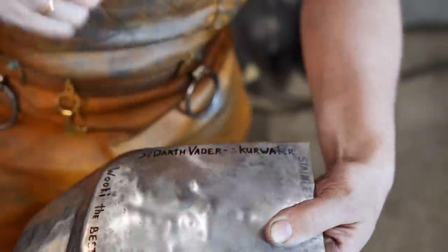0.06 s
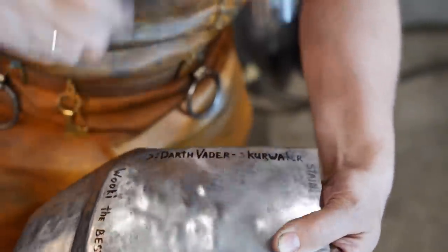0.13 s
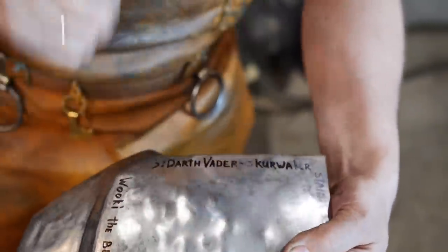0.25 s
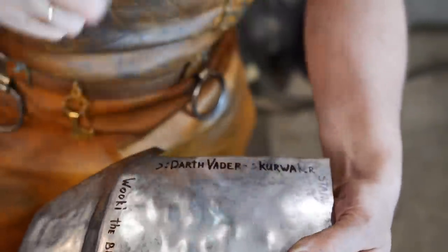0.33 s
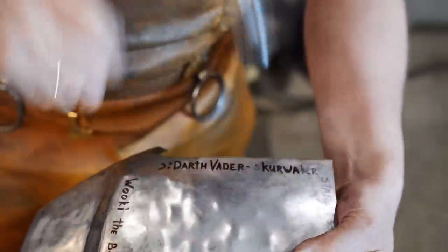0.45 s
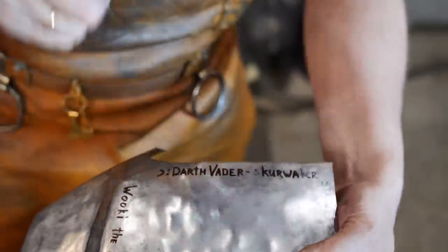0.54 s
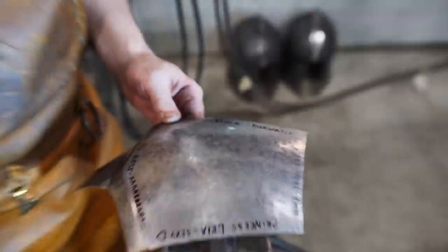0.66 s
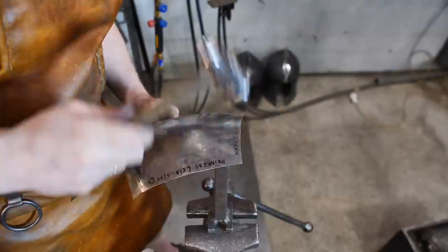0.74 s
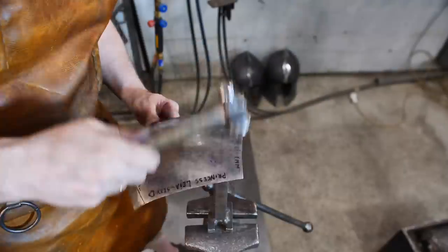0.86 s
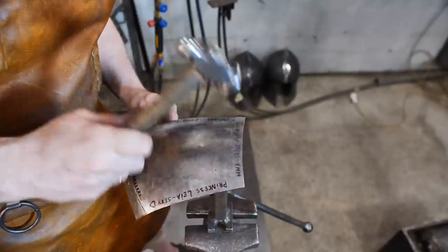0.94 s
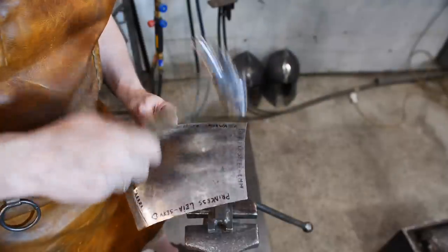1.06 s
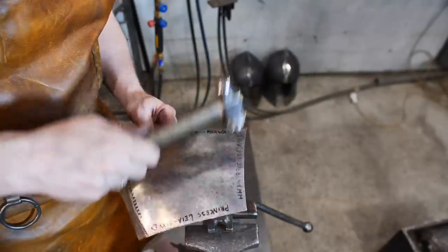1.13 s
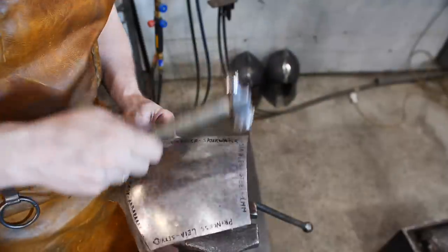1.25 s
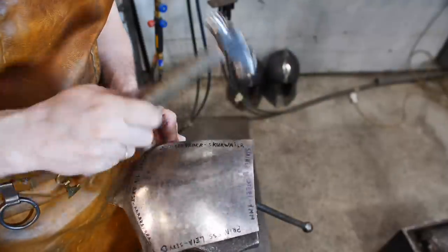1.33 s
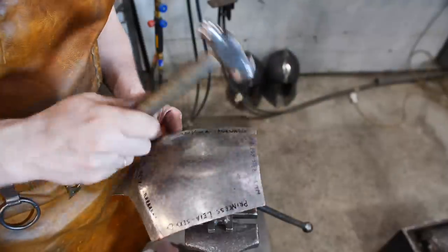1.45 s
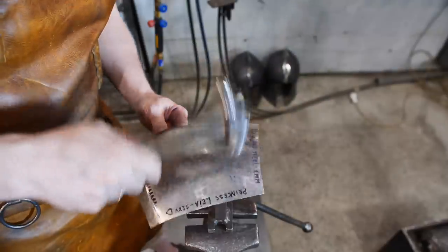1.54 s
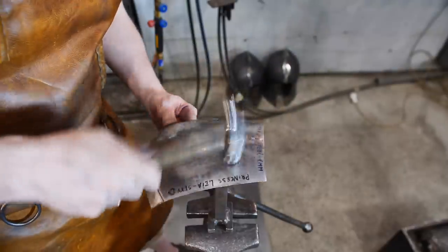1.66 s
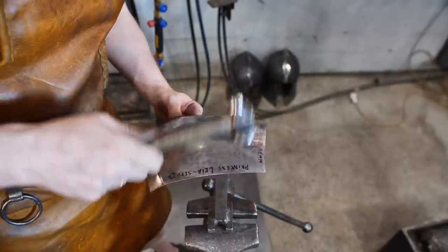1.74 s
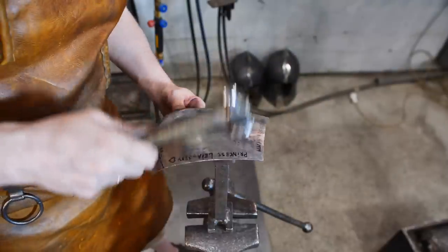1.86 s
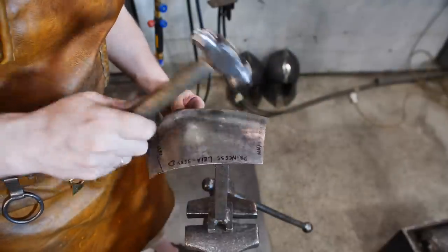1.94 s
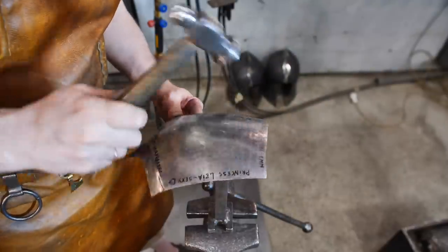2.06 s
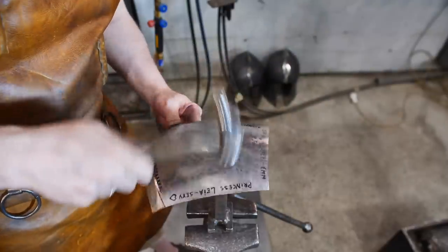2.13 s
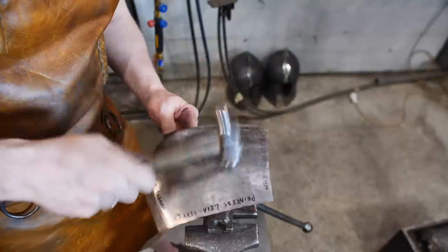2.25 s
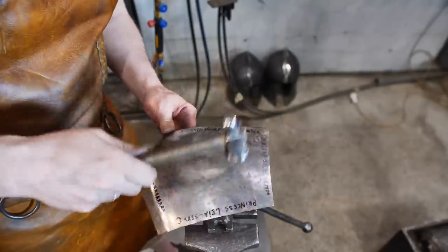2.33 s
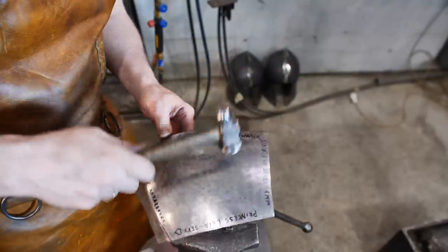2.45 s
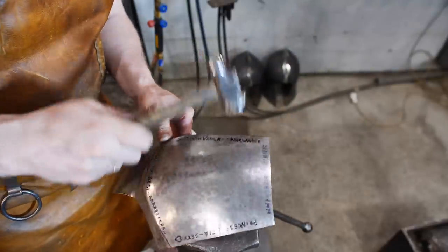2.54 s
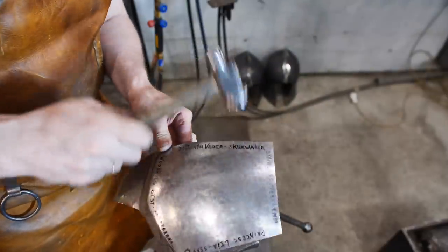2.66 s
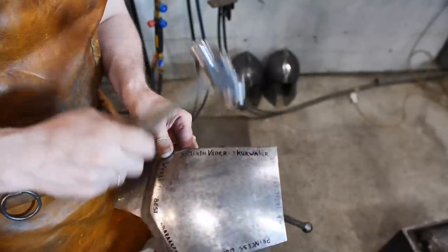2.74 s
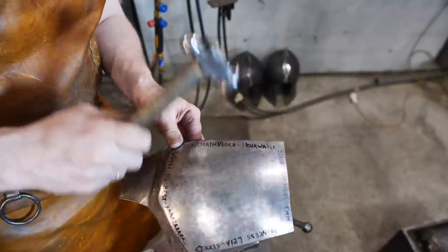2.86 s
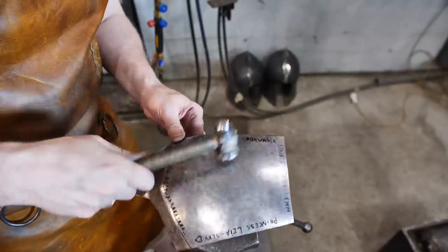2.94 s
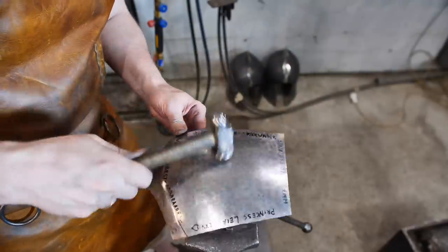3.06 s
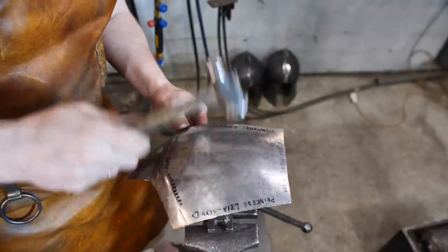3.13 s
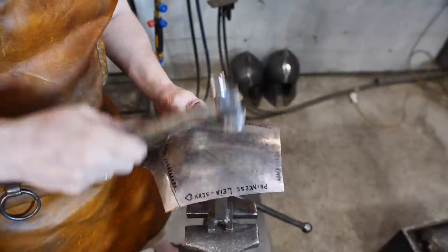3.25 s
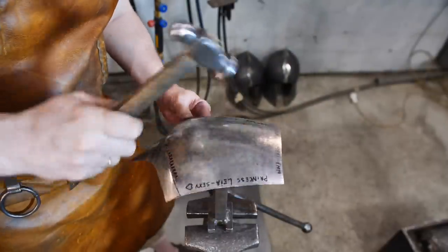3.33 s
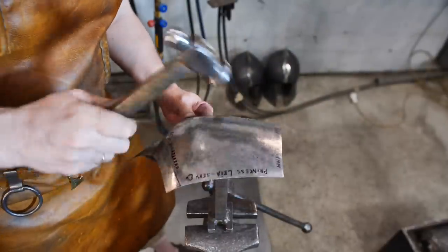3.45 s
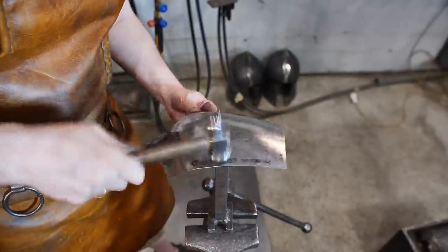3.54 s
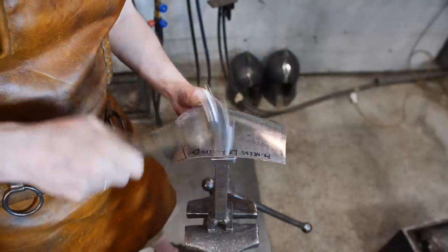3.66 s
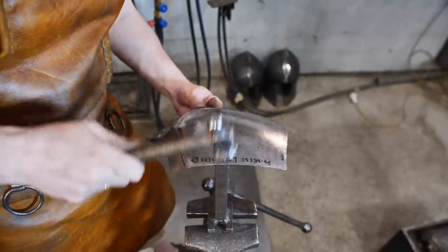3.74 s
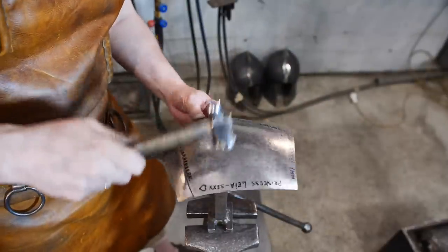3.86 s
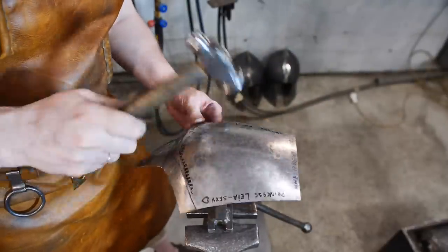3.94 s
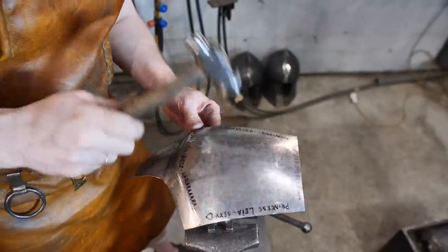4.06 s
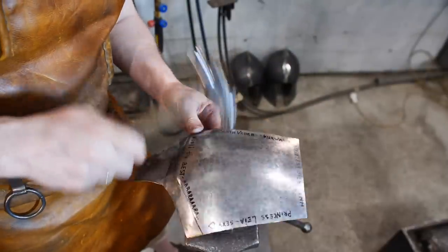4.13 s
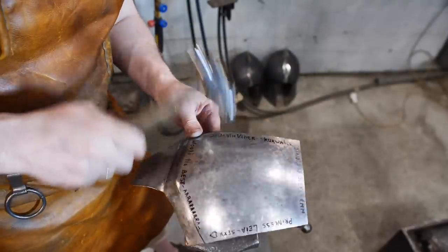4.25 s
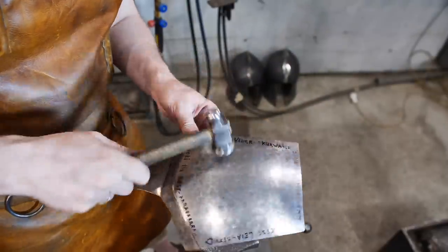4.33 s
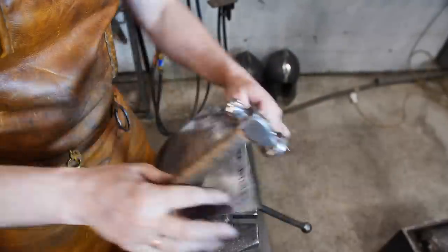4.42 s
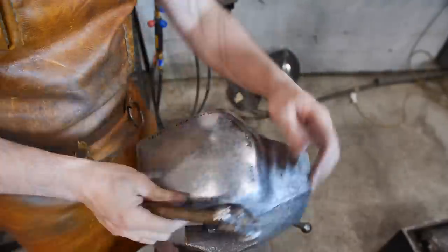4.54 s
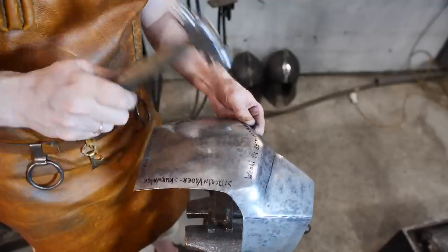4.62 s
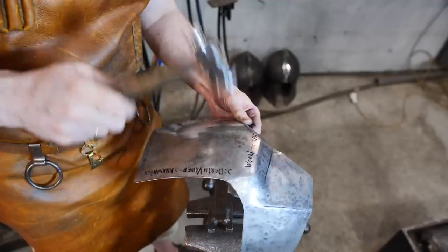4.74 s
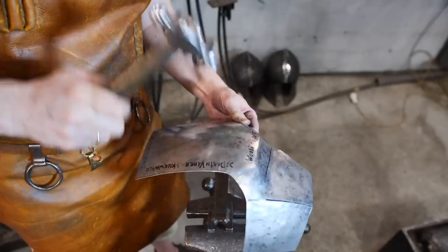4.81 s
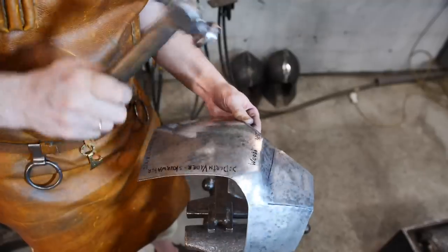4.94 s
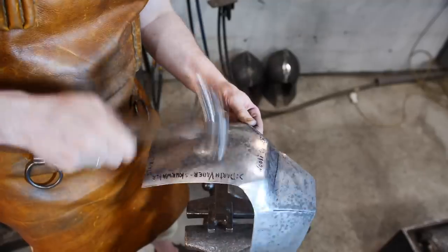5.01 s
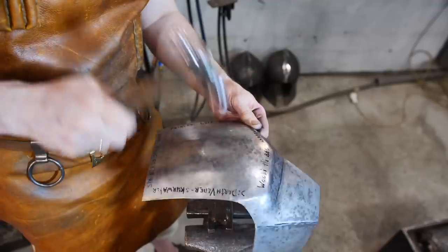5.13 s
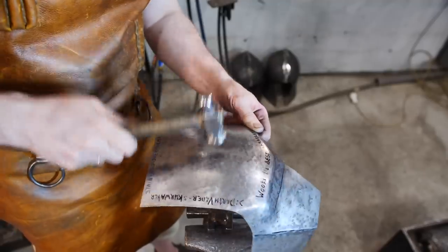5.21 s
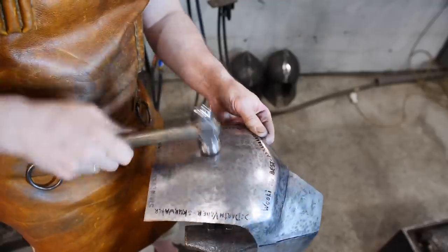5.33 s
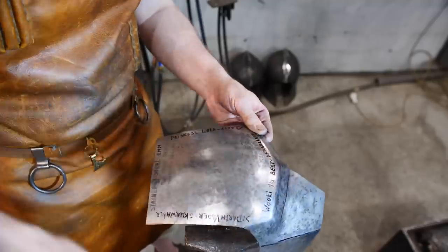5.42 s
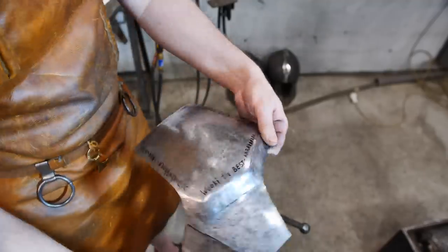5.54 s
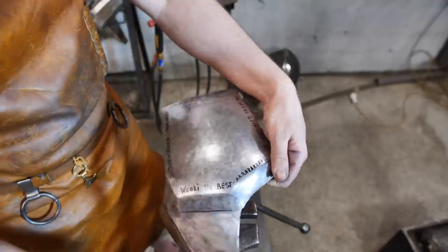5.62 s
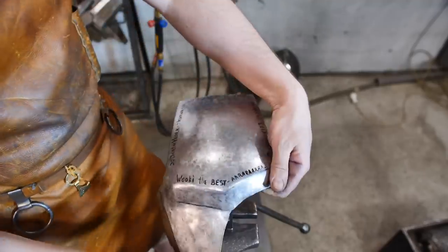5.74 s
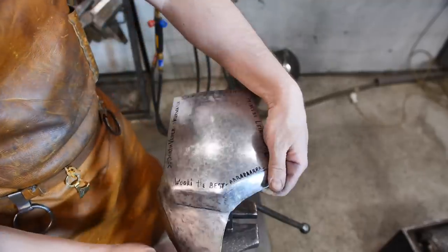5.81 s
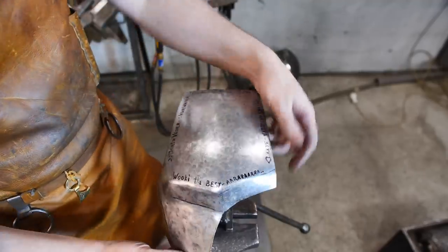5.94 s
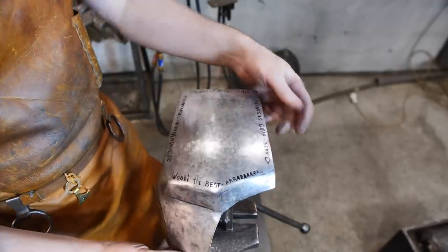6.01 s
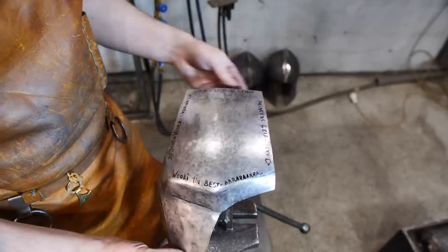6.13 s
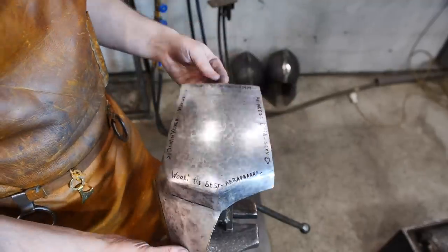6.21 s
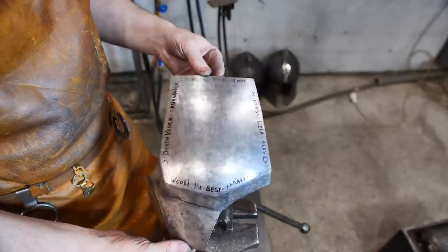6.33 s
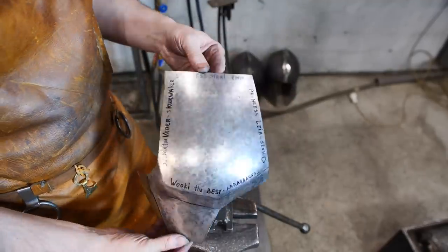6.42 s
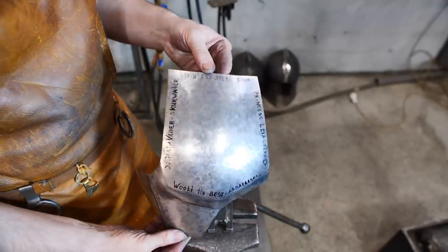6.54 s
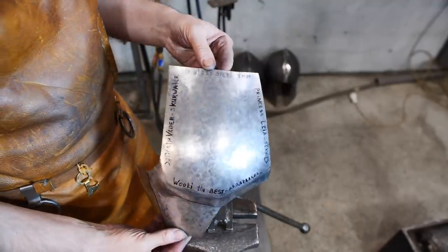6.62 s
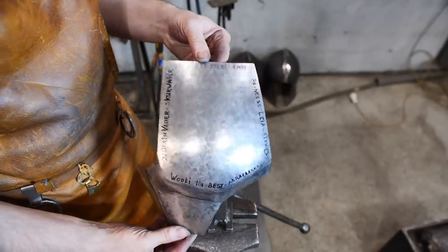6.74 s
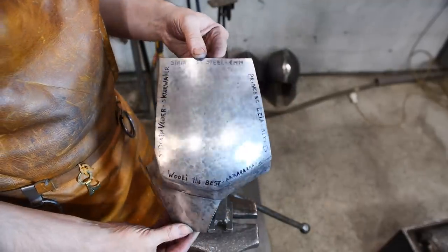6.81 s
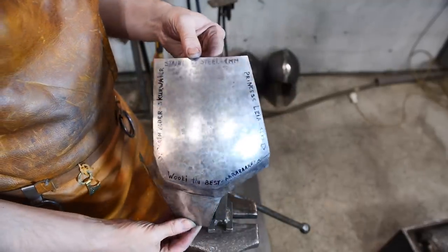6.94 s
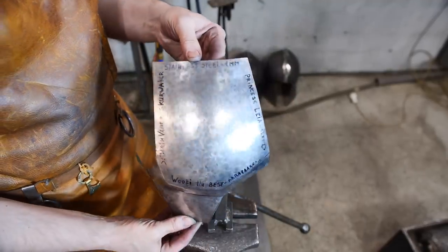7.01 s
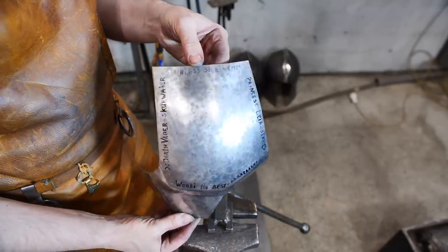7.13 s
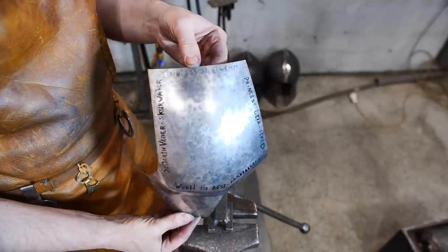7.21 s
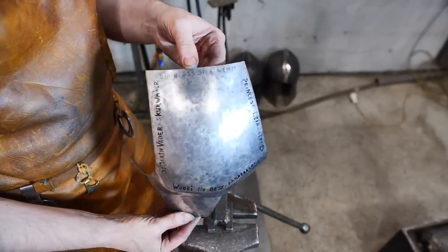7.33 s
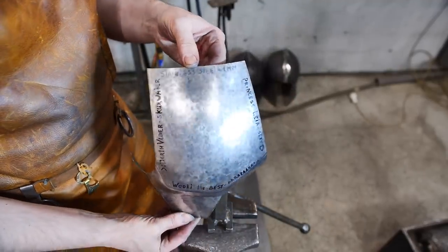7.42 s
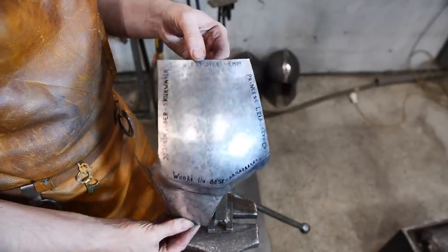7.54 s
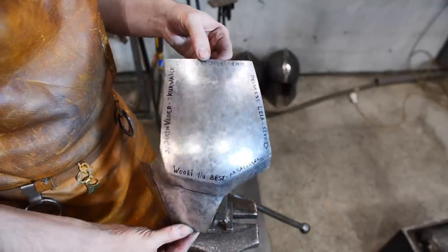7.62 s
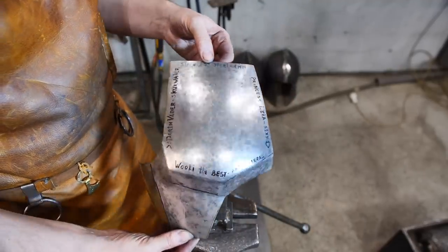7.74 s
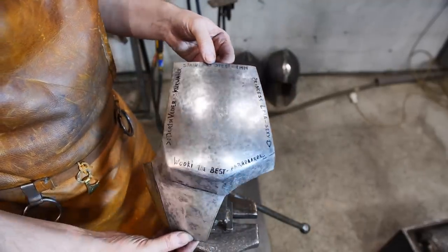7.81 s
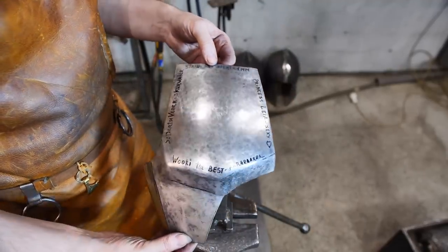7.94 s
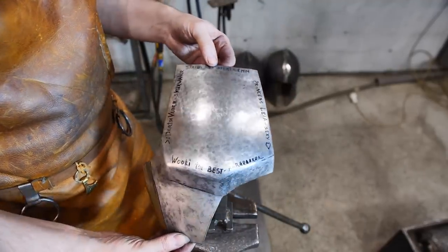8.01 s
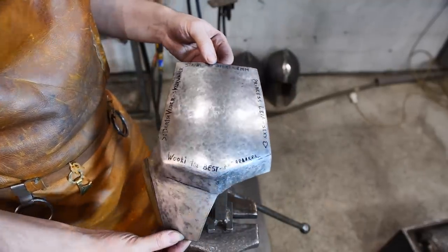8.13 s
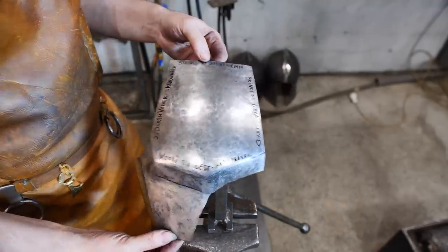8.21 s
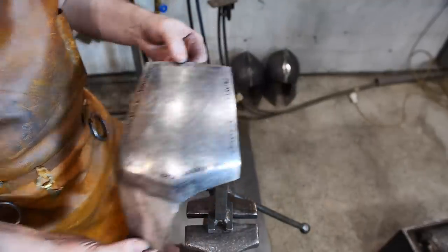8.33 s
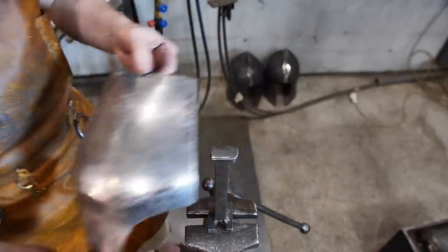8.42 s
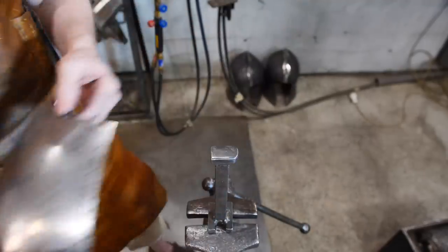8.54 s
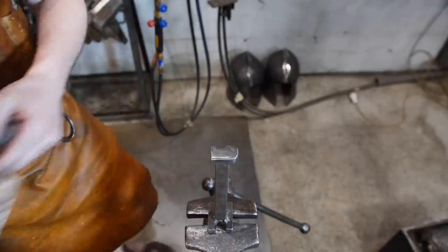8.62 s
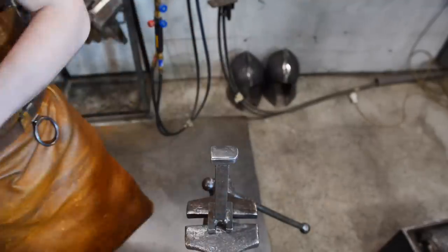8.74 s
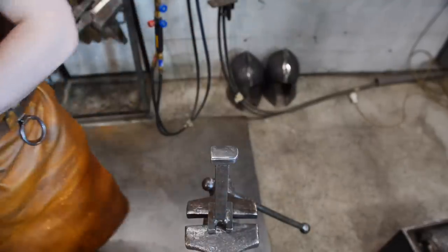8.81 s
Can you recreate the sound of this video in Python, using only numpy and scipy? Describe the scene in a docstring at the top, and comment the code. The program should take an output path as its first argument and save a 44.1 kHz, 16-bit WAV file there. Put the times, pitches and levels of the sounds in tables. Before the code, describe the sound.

Close and dry in a small workshop, a light hammer strikes thin sheet steel on a stake. About six heavier blows stop abruptly in a short silence, then fast, even, bright clangs follow, many as tight double hits, with one brief scrape midway. After the last blow the sheet clanks and rubs against the stake while low hum, hiss and a thin high whine come up.

```python
"""A small hammer planishes a thin curved steel sheet over a stake in quick even runs, many blows heard as close pairs.
Then the sheet is shifted, knocked and slid about by hand while hum, hiss and whine rise in level.
Hits ring paired sine modes and burst noise bands; slides excite the modes with dense random catches.
Narrow tones are noise through resonances; the workshop is a wavering sine, shaped noise and a high sine."""
import sys
import numpy as np
from scipy import signal
from scipy.fft import rfft, irfft
from scipy.io import wavfile

SR = 44100
rng = np.random.default_rng(int(sys.argv[2]) if len(sys.argv) > 2 else 0)


def dump_mix(stems):
    """Bounce the given channels to the path in sys.argv[1] as a 16-bit WAV at rate SR."""
    frames = np.atleast_2d(stems).T  # one column per channel
    limited = np.clip(frames, -1, 1)  # hard clip at full scale
    pcm = np.round(limited * 32767).astype(np.int16)
    wavfile.write(sys.argv[1], SR, pcm)


N = 391148


def amp(db):
    """Decibels to gain."""
    return 10 ** (np.asarray(db) / 20)


def unit(x):
    """Scaled to rms 1."""
    return x / np.sqrt(np.mean(x ** 2) + 1e-20)


def in_time(rows):
    """Columns of a curve, one value a sample."""
    s, *columns = np.transpose(rows)
    return [np.interp(np.arange(N) / SR, s, c) for c in columns]


def at_hz(rows, hz):
    """Columns of a table at the given frequency, interpolated over log frequency."""
    where, *columns = np.transpose(rows)
    return [np.interp(np.log(hz), np.log(where), c) for c in columns]


def clicks(times_s, sizes):
    """A train of single samples."""
    out = np.full(N, 1e-18)
    np.add.at(out, np.round(np.asarray(times_s) * SR).astype(int), sizes)
    return out


def fade(x, t60_s):
    """Each click dies away by 60 dB in t60_s."""
    return signal.lfilter([1], [1, -amp(-60 / (t60_s * SR))], x)


def ring(x, hz, t60_s):
    """Two-pole resonance: a unit click starts a dying sine of height 1."""
    r = amp(-60 / (t60_s * SR))
    w = 2 * np.pi * hz / SR
    return signal.lfilter([0, np.sin(w)], [1, -2 * r * np.cos(w), r * r], x)


def band_pass(x, edges_hz):
    """Second-order Butterworth band."""
    return signal.sosfilt(signal.butter(2, edges_hz, "band", fs=SR, output="sos"), x)


def bands(low_hz):
    """Third-octave noise bands of rms 1 with centre and width in Hz, neighbours unrelated."""
    white = rng.standard_normal((2, N))
    edges = low_hz * 2 ** (np.arange(40) / 3)
    edges = edges[edges < .45 * SR]
    for k, (low, high) in enumerate(zip(edges, edges[1:])):
        yield unit(band_pass(white[k % 2], [low, high])), np.sqrt(low * high), high - low


# Hum, hiss and whine are brought up by rising gain.
# Each row: time in seconds, hum level in dB, hiss level in dB (before HISS_TRIM_DB).
BACKGROUND_LEVEL = [(5.6, -94, -96), (5.85, -85.5, -88), (6.1, -75, -85.5), (6.75, -70, -89),
                    (7.35, -65.5, -76), (7.6, -63.5, -80.5), (8.5, -58, -70), (8.87, -59, -68)]
# Hiss spectrum. Each row: frequency in Hz, relative density in dB per Hz.
HISS_SPECTRUM = [(40, -21.5), (100, -13), (200, -16), (500, -25), (1100, -21.5), (1800, -39), (3500, -36),
                 (7000, -42.5), (12000, -45), (16000, -46)]
HUM_HZ, WHINE_HZ = 48, 15009
HISS_TRIM_DB, WHINE_RE_HISS_DB = -10.0, -1


def workshop():
    """Mains hum wavering in level and phase, a broad hiss and a thin high whine."""
    hum_db, hiss_db = in_time(BACKGROUND_LEVEL)
    t = np.arange(N) / SR
    hz = np.maximum(np.arange(N // 2 + 1) * SR / N, 20)
    density_db = at_hz(HISS_SPECTRUM, hz)[0] - at_hz(HISS_SPECTRUM, 8400)[0]
    hiss = irfft(rfft(rng.standard_normal(N)) * amp(density_db), N) * np.sqrt(SR / 12000)
    whine = amp(WHINE_RE_HISS_DB) * np.sin(2 * np.pi * WHINE_HZ * t)
    waver_db = 1.5 * np.interp(t, np.arange(200) / 16, rng.standard_normal(200))
    waver_rad = .25 * np.interp(t, np.arange(200) / 12, rng.standard_normal(200))
    hum = amp(waver_db) * np.sin(2 * np.pi * HUM_HZ * t + waver_rad)
    return amp(hum_db) * np.sqrt(2) * hum + amp(hiss_db + HISS_TRIM_DB) * (hiss + whine)


# Narrow tones of the handled sheet: faint squeaks and, last, a low dull knock.
# Each row: start in seconds, end in seconds, pitch in Hz, level in dB.
NARROW_TONES = [(6.289, 6.416, 574, -62), (6.33, 6.42, 5400, -83), (6.44, 6.52, 3860, -72),
                (6.731, 6.817, 2330, -85), (6.773, 6.9, 3420, -86), (7.58, 7.7, 3520, -83.5),
                (7.75, 7.84, 3500, -80), (7.79, 7.937, 5270, -76), (7.83, 7.928, 3230, -77.5),
                (8.327, 8.472, 3830, -76), (8.329, 8.418, 5280, -83), (8.783, 8.903, 435, -51),
                (8.786, 8.901, 270, -53)]
TONE_T60_S = 2 / 75


def narrow_tones():
    """Noise twice through one narrow resonance, swelling and sinking."""
    out = np.zeros(N + SR)
    for start_s, end_s, hz, level_db in NARROW_TONES:
        count = int((end_s - start_s) * SR)
        noise = rng.standard_normal(SR // 4)
        tone = ring(ring(noise, hz, TONE_T60_S), hz, TONE_T60_S)[-count:]
        out[int(start_s * SR):][:count] += amp(level_db) * unit(tone) * signal.windows.tukey(count, .6)
    return out[:N]


# Modes of sheet on stake, also rung by ringing(). Each row: pitch in Hz, relative level in dB,
# t60 in seconds (before each use scales it).
SHEET_MODES = [(408, -0.5, 0.48), (629.6, 2.5, 0.24), (707, -3, 0.19), (822.5, -4, 0.23), (904, -15, 0.2),
               (1005.6, -1.5, 0.24), (1404, -4.5, 0.22), (1704, -8, 0.17), (2284, 1.5, 0.18),
               (2430, -7.5, 0.31), (2812, -0.5, 0.22), (2946, -6, 0.25), (3160, -5, .25), (3494, 2.5, 0.11),
               (3770, -3.5, 0.22), (3905, -5, 0.23), (4080, -6, .25), (4470, -13.5, 0.3), (4700, -20, .25),
               (4900, -8.5, 0.22), (5280, -3, 0.2), (5370, -3, 0.09), (5730, -7, 0.32), (6100, -13.5, 0.24),
               (7100, -21.5, .15), (9090, -10, 0.089), (11150, -13.5, 0.08), (12000, -16, 0.033)]
# The sheet slides on the stake; one row is a short swell of noise near 4.59 s among the blows. Each row: peak
# in seconds, rise in seconds, fall in seconds (each over 20 dB), # hollow level in dB, clang level in dB,
# treble level in dB.
SLIDES = [(.69, .2, .1, -72.5, -100, -104), (0.744, 0.013, 0.017, -64, -69.5, -86),
          (4.588, 0.029, 0.0078, -48, -40.5, -59), (6.14, 0.047, 0.11, -69, -77.5, -89.5),
          (6.33, .04, 0.15, -75, -88, -90), (6.46, 0.1, 0.18, -61, -80, -77.5),
          (6.74, .02, 0.12, -89, -73.5, -81), (7.64, .15, 0.16, -78, -93, -89),
          (7.88, 0.13, .1, -87.5, -75, -76.5), (8.42, 0.41, 0.11, -76, -81, -81),
          (8.552, 0.065, 0.17, -50, -46, -75), (8.83, 0.083, 0.37, -55.5, -63, -68)]
SLIDE_BANDS_HZ = ([300, 1500], [1500, 6500], [6500, 15000])   # hollow, clang, treble


def slides(catches_per_s, mode_share):
    """Dense tiny catches excite the modes and the overtones under each stroke."""
    t, levels = np.arange(N) / SR, np.zeros((3, N))
    for peak_s, rise_s, fall_s, *band_db in SLIDES:
        near = slice(max(int((peak_s - 3 * rise_s) * SR), 0), int((peak_s + 3 * fall_s) * SR))
        away = np.maximum((peak_s - t[near]) / rise_s, (t[near] - peak_s) / fall_s)
        levels[:, near] += amp(np.array(band_db)[:, None] - 20 * away)
    caught = rng.random(N) < catches_per_s / SR
    size_db = 3.6 * np.minimum(rng.exponential(1, N), 4.0)
    catches = caught * amp(size_db) * rng.choice([-1, 1], N)
    rings = sum(amp(level_db) * ring(catches + 1e-18, hz, t60_s / 2.5) for hz, level_db, t60_s in SHEET_MODES)
    overtones = signal.lfilter([1], [1, -.6], catches + 1.8 * rng.standard_normal(N))
    rub = mode_share * unit(rings) + unit(overtones)
    out = np.zeros(N)
    for sign, level, edges_hz in zip((1, -1, 1), levels, SLIDE_BANDS_HZ):
        out += sign * level * unit(band_pass(rub, edges_hz))
    return out


def room(x, t60_s, wet_db):
    """The walls answer with a dense dying wash."""
    t = np.arange(SR // 3) / SR
    wash = rng.standard_normal(len(t)) * amp(-60 * t / t60_s) * (1 - np.exp(-t / 0.0008))
    return x + amp(wet_db) * signal.fftconvolve(x, wash / np.sqrt(np.sum(wash ** 2)))[:N]


def slaps(s, peak_db):
    """A short inward pulse with a small swing on either side."""
    t = np.arange(-60, 61) / SR / 0.00023
    return signal.fftconvolve(clicks(s, amp(peak_db)), (t ** 2 - 1) * np.exp(-t ** 2 / 2), "same")


# Colours of a hit, in Hz: push, hollow, middle, clang, bright, treble.
COLOUR_HZ = [200, 900, 2000, 3200, 5700, 10000]
PAIR_SPLIT = .006   # each mode is a close pair that beats: rms half gap, as a share of pitch
CONTACT_S, SLAP_LAG_S = 0.0012, .0015   # the ring builds while the hit dwells; the slap follows


def colour_db(levels, hz):
    """Level of every hit at one frequency, between its colour rows."""
    return np.array([np.interp(np.log(hz), np.log(COLOUR_HZ), hit) for hit in levels.T])


def ringing(s, levels, favoured_hz, mode_db, ring_share, spread_db, detune, favour_db):
    """Grip and spot change by hit: modes shift a little, those near the favoured pitches stand out."""
    hz, level_db, t60_s = np.transpose(SHEET_MODES)
    chance = rng.standard_normal((len(s), 5, len(hz)))
    out = np.zeros(N + SR)
    for k, at in enumerate(np.round(s * SR).astype(int)):
        t = np.arange(int(.3 * ring_share[k] * SR)) / SR
        level_chance, pitch_chance, phase_chance, split_chance, beat_chance = chance[k]
        near = sum(np.exp(-(np.log(hz / f) / 0.049) ** 2) for f in favoured_hz[:, k])
        colour = np.interp(np.log(hz), np.log(COLOUR_HZ), levels[:, k])
        gains = amp(colour + level_db + mode_db[k] + favour_db * near + spread_db * level_chance)
        turns = np.outer(hz * (1 + detune * pitch_chance), t) + .5 * phase_chance[:, None]
        beat_turns = np.outer(PAIR_SPLIT * hz * split_chance, t) + beat_chance[:, None]
        decay = np.exp(np.outer(-np.log(1000) / (t60_s * ring_share[k]), t))
        modes = decay * np.sin(2 * np.pi * turns.astype(np.float32))
        modes *= np.sqrt(2) * np.cos(2 * np.pi * beat_turns.astype(np.float32))
        edges = (1 - np.exp(-t / CONTACT_S)) * np.clip(5 - 5 * t / t[-1], 0, 1)
        out[at:at + len(t)] += edges * (gains @ modes)
    return out[:N]


# Dense overtones between the modes. Each row: frequency in Hz, relative crack level in dB, crack t60 in seconds,
# relative tail level in dB, tail t60 in seconds (before tail_share).
CLATTER = [(312, -1, .03, -9, 0.076), (463, -3.5, 0.04, -12, 0.5), (970, -3.5, 0.023, -15, 0.53),
           (1840, -15, 0.17, -10, 0.29), (2900, -3.5, 0.023, -4, 0.23), (4100, -2.5, 0.089, -12.5, 0.23),
           (5850, -10, 0.15, -12, 0.14), (7000, -18, 0.023, -10, 0.17), (9500, -9.5, 0.048, -15.5, 0.061),
           (14400, -15.5, 0.022, -26, 0.054)]


def struck_sheet(s, levels, favoured_hz, ring_share, noises, mode_db, spread_db, clatter_db, tick_db,
                 tail_share, fade_in_db, detune, wet_db):
    """Each hit rings the modes, ticks, cracks and leaves a tail that dies by band."""
    rings = ringing(s, levels, favoured_hz, mode_db + 0 * s, ring_share, spread_db, detune, favour_db=9.0)
    out = room(rings, t60_s=0.23 * tail_share, wet_db=wet_db)
    chance = rng.standard_normal((len(s), 32))
    close = np.diff(s, prepend=-1) < .11
    step = 4   # samples per envelope point
    starts = np.arange(0, N, step)
    for k, (noise, hz, _) in enumerate(noises):
        crack_db, crack_t60_s, tail_db, tail_t60_s = at_hz(CLATTER, hz)
        each = amp(colour_db(levels, hz) + clatter_db + 2.16 * chance[:, k]) ** 2
        power = np.add.reduceat(clicks(s, each), starts)
        close_power = np.add.reduceat(clicks(s, each * close), starts)
        # envelopes are powers, so t60 is halved
        tick = amp(tick_db) ** 2 * fade(power, 0.003 / step)
        crack = fade(power, crack_t60_s / 2 / step) + tick
        # reflections take a moment to build
        tail = fade(power, tail_share * tail_t60_s / 2 / step) - fade(power, 0.042 / step)
        # closely spaced hits are given a short fade-in of noise
        fade_in = fade(close_power[::-1], 0.098 / step)[::-1]
        crack_power = amp(crack_db) ** 2 * (crack + amp(fade_in_db) ** 2 * fade_in)
        envelope = np.sqrt(crack_power + amp(tail_db) ** 2 * np.abs(tail))
        out += noise * np.repeat(envelope, step)[:N]
    return out


# The sheet knocks on the stake; the first two rows are faint hits heard while the blows are silent. Each row:
# time in seconds, bright level in dB, then clang, hollow and treble # in dB re bright, favoured pitch in Hz,
# ring share of the mode t60 (clipped to .1-2). Levels are before KNOCKS_GAIN.
KNOCKS = [(0.734, -63, 2, 6.5, -12, 405, 0.47), (0.7495, -61.5, 6, -8, -8, 972, 0.67),
          (5.4945, -57, 8, -7, -24, 395, .6), (5.507, -50, 10, 9, -18, 2750, .4),
          (5.5157, -33.5, 7.5, -2, -11, 2780, 0.38), (5.5235, -31.5, -14, -3, -8, 2700, 0.13),
          (5.53, -39.5, -18, 7.5, -5, 2720, 0.36), (5.735, -45, -6, 9, -12, 421, 0.45),
          (5.7998, -54.5, 16, 20.5, -27, 2800, 0.15), (5.8517, -69, 20, 26, -20, 703, 1.2),
          (5.9005, -41.5, -4, 13, 5, 690, .6), (5.9675, -36.5, -8, 6, 3, 662, 0.64),
          (6.0921, -47.5, -15, 4, -13, 490, .5), (6.736, -67.5, -1.5, -18.5, -8.5, 696, 0.73),
          (7.0905, -36.5, -9, 3, -2, 977, 1.6), (7.0932, -32.5, -11, 8.5, 3, 3530, 0.93),
          (7.0975, -32, -13, 6, 5, 1410, 1.07), (8.226, -49, -6.5, -14, -13, 3740, 0.64),
          (8.7965, -56, -4.5, 21.5, -9.5, 444, .7), (8.8348, -59, 0, -6, -4, 440, .8)]


def knocks(noises):
    """Held loosely the sheet rings longer and duller, and each knock thuds with an outward pulse."""
    s, bright, clang, hollow, treble, favoured_hz, ring_share = np.transpose(KNOCKS)
    middle = clang + 0.1 * (hollow - clang)
    levels = bright + np.array([hollow - 9.0, hollow, middle, clang, 0 * s, treble])
    out = struck_sheet(s, levels, favoured_hz[None], np.clip(ring_share, .1, 2), noises, mode_db=-8.5,
                       spread_db=3.0, clatter_db=-5.5, tick_db=4.5, tail_share=1.51, fade_in_db=-60,
                       detune=0.008, wet_db=-5.5)
    return out - slaps(s + SLAP_LAG_S, levels[1] - 1.5)


# Some blows carry a low thump. Each row: time in seconds, thump level in dB (the dip alone peaks 6 dB lower).
THUMPS = [(.011, -22), (.113, -50), (0.204, -24.5), (.304, -23.5), (0.392, -25), (.497, -23), (0.814, -31),
          (1.206, -33), (1.801, -37), (1.98, -30.5), (2.418, -34.5), (2.774, -35), (3.255, -25.5),
          (3.984, -37), (5.103, -39)]
REBOUND_DB = -12   # re thump level


def thumps():
    """A quick inward dip, then a slow rebound."""
    s, thump_db = np.transpose(THUMPS)
    t = np.arange(SR // 5) / SR
    dip = (t / 0.0024) * np.exp(1 - t / 0.0012)
    late = np.maximum(t - .008, 0) / 0.019
    rebound = amp(REBOUND_DB) * late * np.exp(1 - late)
    return signal.fftconvolve(clicks(s, amp(thump_db)), rebound - dip)[:N]


NO = -99   # dB: single hit
# Hammer blows, many heard as a close pair. Each row: time in seconds, first hit treble in dB,
# second hit treble in dB (NO for none), favoured high pitch in Hz. Levels are before BLOWS_GAIN.
BLOWS = [(-.003, -28.5, -16.5, 4020), (.0977, -21.5, -19.5, 3190), (.188, -35, -14, 4000),
         (.2902, -22, -20.5, 2420), (.3931, -15.5, NO, 4140), (.4825, -25.5, -22, 3810),
         (.582, -16, NO, 3850), (.7980, -26, -22.5, 3450), (.853, -28, -20.5, 3650), (.913, -25, -23, 2770),
         (.9775, -18, NO, 4890), (1.0321, -18, NO, 4400), (1.0807, -26, -24.5, 3770),
         (1.1345, -36, -21, 4070), (1.2057, -20, NO, 4000), (1.2534, -36, -22.5, 5550),
         (1.3130, -54, -21, 3020), (1.3748, -31, -18, 3150), (1.4463, -21, NO, 4000),
         (1.493, -36, -22, 3770), (1.5606, -21.5, NO, 3800), (1.6181, -20.5, NO, 2800),
         (1.6752, -19.5, NO, 3770), (1.7399, -19, NO, 3670), (1.8017, -19.5, NO, 3500),
         (1.8524, -30, -23, 3800), (1.921, -19, NO, 3450), (1.9815, -19, NO, 3900),
         (2.045, -23.5, NO, 3470), (2.0965, -24, -33, 3470), (2.162, -21.5, NO, 2930),
         (2.2223, -29, NO, 3780), (2.2833, -31.5, NO, 3730), (2.3425, -23.5, NO, 2950),
         (2.4035, -25.5, -28, 3760), (2.4691, -22, NO, 3490), (2.5197, -34, -20, 3440),
         (2.581, -32, -23, 3920), (2.6445, -24, -25.5, 4050), (2.7082, -17, -38.5, 2960),
         (2.7594, -45, -17.5, 5300), (2.8368, -20, NO, 2280), (2.8811, -31.5, -18, 3950),
         (2.9522, -20.5, NO, 4150), (3.0067, -29.5, -24, 3700), (3.0728, -22, NO, 3650),
         (3.128, -25, -26, 3750), (3.1953, -19, NO, 3750), (3.24, -43, -17.5, 3800),
         (3.3155, -20.5, -30, 3800), (3.38, -19.5, NO, 3800), (3.429, -30, -24, 3500),
         (3.4991, -19.5, NO, 3470), (3.5569, -19, NO, 3470), (3.6093, -31, -22, 3430),
         (3.6725, -41, -21, 3870), (3.7375, -23, -28.5, 3610), (3.8025, -22.5, NO, 3500),
         (3.8588, -28.5, -25.5, 3800), (3.9172, -33, -25.5, 3850), (3.983, -20.5, NO, 3700),
         (4.0375, -34, -19.5, 2380), (4.0996, -26, -22.5, 3520), (4.1645, -21.5, -33.5, 3490),
         (4.2274, -21, NO, 3480), (4.283, -27, -31, 4090), (4.34, -23, -28, 3550),
         (4.599, -25.5, -25, 2960), (4.6678, -19.5, NO, 5200), (4.719, -31, -22, 2780),
         (4.7835, -27.5, -20, 2500), (4.845, -35, -20.5, 3460), (4.914, -18, NO, 2290),
         (4.9758, -19.5, NO, 5450), (5.0355, -26.5, -22, 3170), (5.1034, -18, -26.5, 5360),
         (5.157, -39, -21, 5300), (5.227, -22, -40.5, 4050), (5.287, -25.5, -28.5, 4100),
         (5.3537, -20, NO, 3150)]
# The spot of the sheet under the hammer. Each row: from time in seconds, hollow in dB re clang,
# push in dB re clang, favoured low pitch in Hz.
SPOTS = [(-.1, -7.5, -16.5, 370), (.7, -13.5, -20, 424), (1.0, -12, -21, 1010), (1.06, -6.5, -25.5, 1020),
         (1.53, -12.5, -23, 385), (2.13, -6.5, -11, 430), (2.2, 5, -9.5, 1018), (2.32, -6, -17, 820),
         (2.44, -2.5, -23.5, 1120), (2.5, -12.5, -25.5, 410), (2.62, -10.5, -24, 1220),
         (2.86, -14, -23.5, 396), (3.1, -8, -21, 900), (3.17, -11, -18, 608), (3.3, -12.5, -24, 421),
         (3.9, -11, -21, 634), (4.15, -5, -20, 1260), (4.27, -4.5, -20, 1410), (4.5, -8, -22, 1036),
         (4.83, -10, -23, 1000), (5.26, -11, -23, 443)]
PAIR_GAP_S = .0148
# a firm hit's treble, its clang re treble; softer hits lose more treble than clang
FIRM_DB, CLANG_DB, CLANG_PER_DB = -20, -7, 0.4974
SLAP_DB, SLAP_PER_DB = 8.5, 1.63   # slap re middle where hollow equals clang; change per dB of hollowness


def hammer(noises):
    """Pressed on the stake the sheet rings short; hits push the air and slap harder on hollow spots."""
    start_s, first_db, second_db, high_hz = np.transpose(BLOWS)
    s = np.maximum(np.c_[start_s, start_s + PAIR_GAP_S].ravel(), 0)
    treble, high_hz = np.c_[first_db, second_db].ravel(), np.repeat(high_hz, 2)
    heard = treble > NO
    s, treble, high_hz = s[heard], treble[heard], high_hz[heard]
    spots = np.array(SPOTS)
    _, hollow, push_db, low_hz = spots[np.searchsorted(spots[:, 0], s) - 1].T
    clang = CLANG_DB - CLANG_PER_DB * (treble - FIRM_DB)
    middle = clang - 0.32 * np.abs(hollow)
    levels = treble + np.array([clang + push_db, clang + hollow, middle, clang, 0.85 * clang, 0 * s])
    out = struck_sheet(s, levels, np.array([high_hz, low_hz]), 0.4 + 0 * s, noises, mode_db=-14.5,
                       spread_db=3.5, clatter_db=-8.0, tick_db=-0.5, tail_share=0.89, fade_in_db=-20.5,
                       detune=.008, wet_db=-0.5)
    out += slaps(s + SLAP_LAG_S, levels[2] + SLAP_DB + SLAP_PER_DB * np.minimum(hollow, 4.0))
    push = fade(clicks(s, amp(levels[0] - 19.0)), 0.0033)
    swing_back = 0.18 * fade(fade(push, 0.082) / 200, 0.082)
    return out - fade(push, 0.014) + swing_back


# The sound of the blows is cut to silence, then returns. Each row: time in seconds, gain in dB.
BLOWS_GAIN = [(0, 2.5), (.585, 3), (.594, -55.5), (.79, -70), (.797, 3)]
# Gain on the knocks, with a brief dip near 5.67 s. Each row: time in seconds, gain in dB.
KNOCKS_GAIN = [(0, -3), (5.62, -8), (5.675, -26.5), (5.69, -10)]


def scene():
    """Hammering and handling over the workshop."""
    noises = list(bands(low_hz=276.8))
    blows = (hammer(noises) + thumps()) * amp(in_time(BLOWS_GAIN)[0])
    levelled_knocks = knocks(noises) * amp(in_time(KNOCKS_GAIN)[0])
    handling = levelled_knocks + slides(catches_per_s=1500, mode_share=0.86) + narrow_tones()
    return (blows + handling + workshop())[None]


CUTOFF_HZ = 17000   # 50 dB down from here up


def record(dry):
    """The top is cut by a steep low-pass."""
    return signal.sosfilt(signal.cheby2(10, 50, CUTOFF_HZ, fs=SR, output="sos"), dry)


dry = scene()
out = record(dry)
dump_mix(out)
```